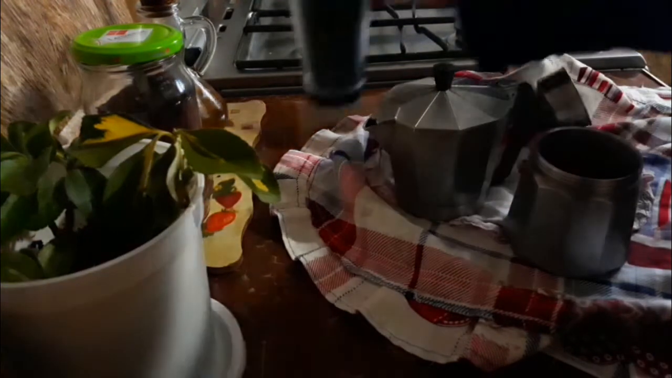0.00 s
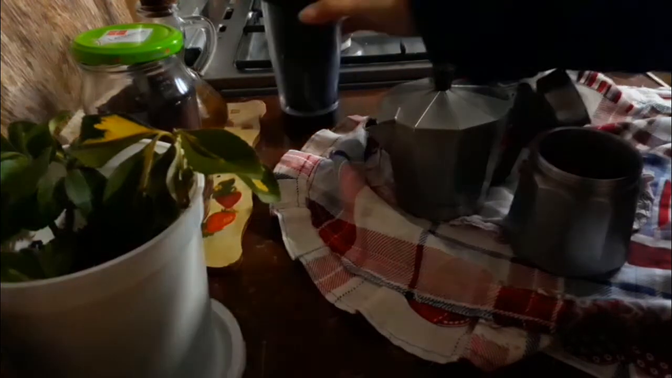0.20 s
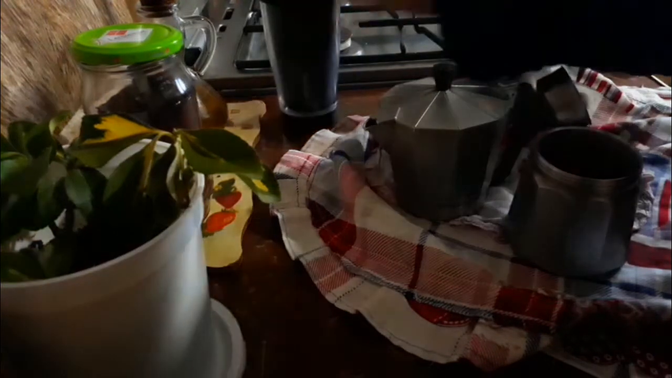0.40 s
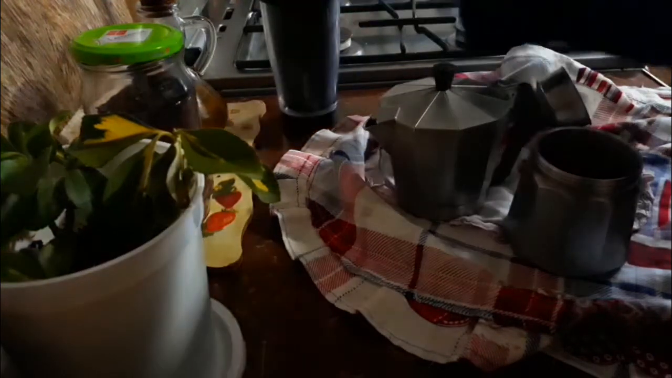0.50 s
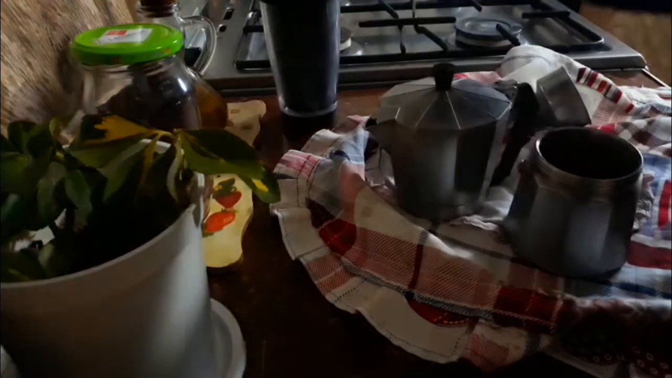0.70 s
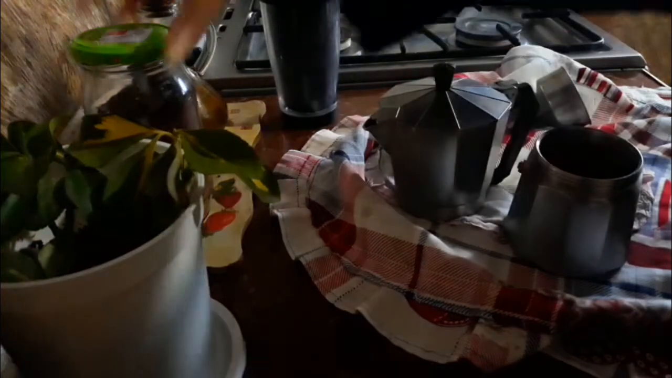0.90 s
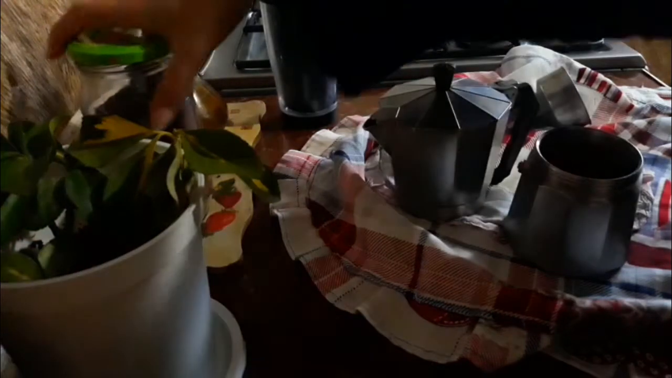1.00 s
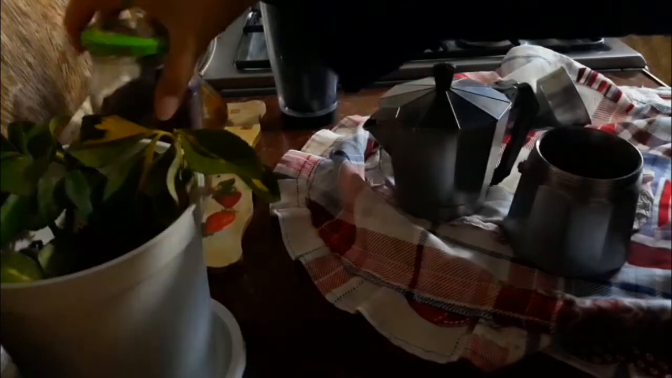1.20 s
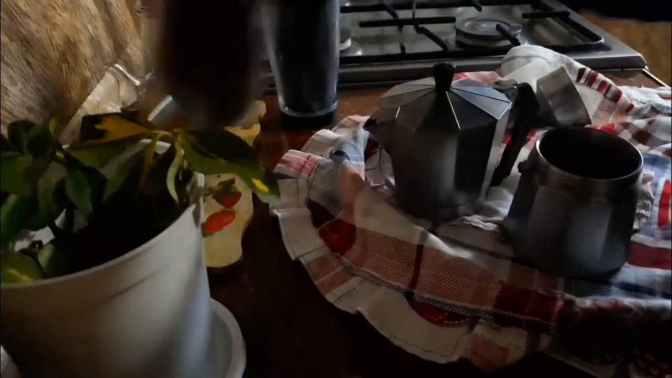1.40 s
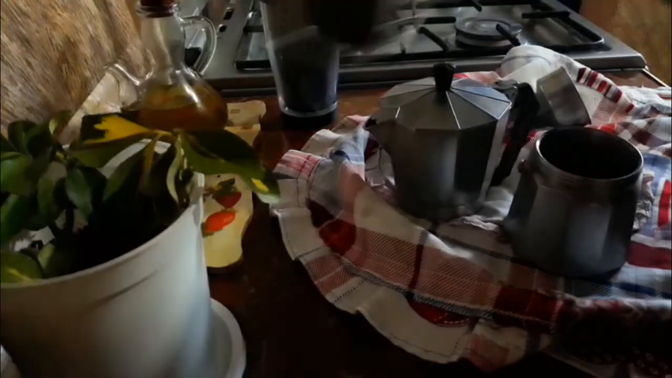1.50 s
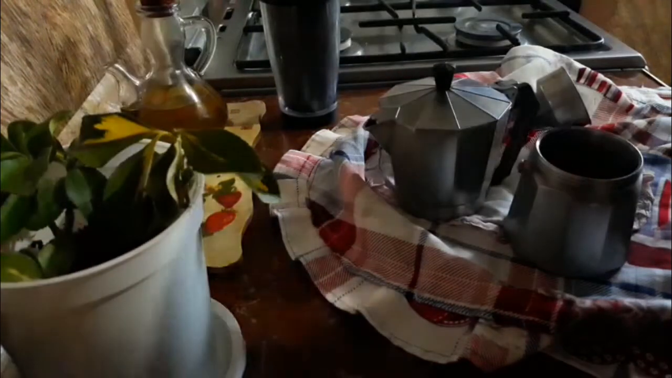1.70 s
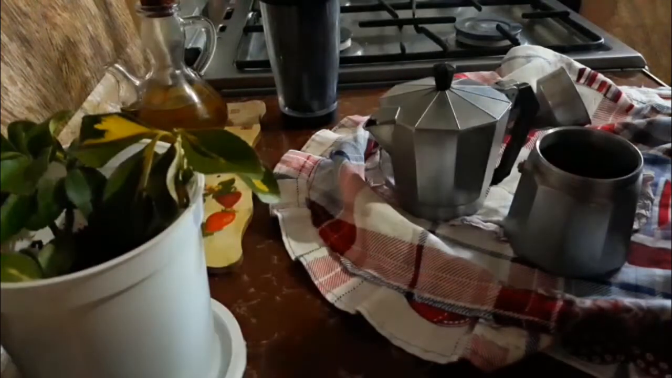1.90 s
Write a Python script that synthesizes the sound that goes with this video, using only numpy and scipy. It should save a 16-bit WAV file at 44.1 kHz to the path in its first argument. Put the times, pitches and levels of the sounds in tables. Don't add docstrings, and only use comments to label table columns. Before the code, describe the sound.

A hollow, woody knock dominates at 0.22 seconds, a light touch and hard blow almost merged, with a weak rebound at 0.3 and a short kitchen echo. Tiny utensil ticks surround it, clearest near 0.39. A faint far squeak comes at 0.76-0.9, a gritty tin lid twist with a small pop and low jar shift around 1.05-1.2, then a close, airy sleeve brush at 1.72-1.95. Low house rumble, hiss and a fading thin whine continue underneath.

```python
import sys
import numpy as np
from scipy import signal
from scipy.fft import rfft, irfft
from scipy.io import wavfile
from scipy.ndimage import uniform_filter1d

SR = 44100
rng = np.random.default_rng(int(sys.argv[2]) if len(sys.argv) > 2 else 0)


def put_to_file(sound):
    columns = np.atleast_2d(sound).T
    safe = np.clip(columns, -1, 1)
    whole_steps = np.round(safe * 32767)
    wavfile.write(sys.argv[1], SR, whole_steps.astype(np.int16))


def rack_gain(trim_db):
    fader = np.asarray(trim_db, float)
    return 10 ** (fader / 20)


N = 88200
T = np.arange(N) / SR

# (time [s], signed force [relative], contact [ms])
BLOWS = [
    (.2233, 0.44, .3),
    (0.2259, 1.2, .36),
    (0.3, 0.18, 1),
]
# (frequency [Hz], level [dB], T60 [s])
PANEL_MODES = [(115, -12, .3), (152, -9, .2), (240.8, 2, 0.22), (276.3, -2, 0.41), (347, -13.5, 0.6),
               (387, 0, .2), (493, -9, .15), (539.3, -9.5, 0.17), (593, 3, .18), (647.4, -20, 0.3),
               (765.4, -5, .25), (860, -22, 0.34), (1010, -12, .1), (1243, -17.5, .12)]
# (frequency [Hz], level [dB])
CRACK_SPECTRUM = [(300, -36), (800, 1), (1200, 7), (2300, -6.5), (3800, -17.5), (5500, -23), (8300, -24),
                  (11000, -39.5)]
# (frequency [Hz], level [dB])
SPILL_SPECTRUM = [(50, -35.5), (130, -10), (260, 2), (650, 1), (1500, -11.5), (2600, -22.5), (5000, -37.5),
                  (8500, -43.5)]
# (time [s], level [dB])
TWIST_EFFORT = [
    (.995, -86),
    (1.015, -77),
    (1.04, -80),
    (1.055, -58.5),
    (1.088, -59),
    (1.101, -48),
    (1.113, -61.5),
    (1.17, -61),
    (1.22, -76),
]
# (frequency [Hz], width [Hz], level [dB], drift as grip shifts [dB/s])
LID_MODES = [(388, 22, 4.5, -34), (730.4, 28.6, 0.5, -34), (1170, 29, -7, -40), (1690, 47, -9.5, -20),
             (1840, 67, -7, 38), (2100, 87, -17, -150), (2550, 78, -9, -65), (2770, 31, -15, -110),
             (3670, 156, -22, 96), (4200, 150, -28, 93), (6220, 53, -18, -10), (9000, 70, -20, -60)]
# (frequency [Hz], level [dB])
GRIT_SPECTRUM = [(100, -21), (250, -6.5), (500, -7), (2000, -23), (4500, -25.5), (8800, -32), (9500, -37)]
# (frequency [Hz], level [dB])
RUB_SPECTRUM = [(1500, -20), (3000, -3), (6000, 2), (8500, -4)]
# (frequency [Hz], level [dB])
RUMBLE_SPECTRUM = [(50, -31), (110, 2), (200, -6.5), (300, -22), (600, -47)]
# (time [s], level [dB])
BRUSH_STROKE = [
    (1.71, -90),
    (1.728, -68),
    (1.76, -68),
    (1.795, -70.5),
    (1.808, -65.5),
    (1.83, -69.5),
    (1.88, -73),
    (1.92, -74),
    (2.0, -79.5),
]
# (frequency [Hz], level [dB])
CLOTH_EARLY = [(2000, -11), (3700, -6), (4700, 4), (8700, 0.5), (9500, -10), (12000, -4), (14000, -11),
               (15200, 1)]
# (frequency [Hz], level [dB])
CLOTH_LATE = [(2000, -8.5), (4000, -5), (6000, 0.5), (8700, 1.5), (9600, -12), (13000, -20), (15500, -16)]
# (start [s], end [s])
CLOTH_TURN_S = (1.82, 1.88)
# (time [s], length [s], frequency [Hz], width [Hz], level [dB])
FOLDS = [
    (1.725, 0.049, 5046, 500, -75),
    (1.785, 0.035, 2740, 300, -76),
    (1.888, 0.054, 2900, 400, -79.5),
]
# (frequency [Hz], width [Hz], level [dB], sag over the hold [dB])
SQUEAK_LINES = [(2590, 70, 0, -7), (2790, 70, 1.5, -22), (2420, 60, -12, -6)]
# (time [s], level [dB], frequency [Hz], width [Hz])
TICKS = [
    (.178, -72, 6500, 3000),
    (.365, -67, 7500, 2000),
    (.391, -59, 8000, 1800),
    (1.806, -66, 8500, 6000),
    (1.014, -74, 2600, 500),
]
# (frequency [Hz], level [dB])
AIR_SPECTRUM = [(38, -25), (62, -2), (115, 1), (170, -6), (240, -17), (600, -24.5), (2000, -32),
                (8800, -35), (9500, -39.5), (15700, -39)]
# (frequency [Hz], T60 [s])
ROOM_DECAY = [(80, 0.6028), (250, .72), (600, .72), (850, 0.67), (1500, 0.67), (2300, 0.59), (3500, 0.48),
              (6000, 0.89), (10000, .5)]


def evened(x):
    return x / np.sqrt(np.mean(x ** 2) + 1e-20)


def coloured(x, spectrum):
    f, db = np.transpose(spectrum)
    hz = np.fft.rfftfreq(len(x), 1 / SR)
    gain = rack_gain(np.interp(np.log(hz + 1), np.log(f + 1), db))
    return irfft(rfft(x) * gain, len(x))


def coloured_noise(spectrum):
    return evened(coloured(rng.standard_normal(N), spectrum))


def curve(points):
    s, db = np.transpose(points)
    return rack_gain(np.interp(T, s, db)) * (T >= s[0])


def resonate(x, hz, width_hz):
    r = np.exp(-np.pi * width_hz / SR)
    pole = r * np.exp(2j * np.pi * hz / SR)
    return 2 * signal.lfilter([1 - r], [1, -pole], x).real


def narrow(x, hz, width_hz):
    return evened(resonate(resonate(x, hz, width_hz), hz, width_hz))


def dying(start_s, t60_s, rise_s):
    t = np.maximum(T - start_s, 0)
    return (1 - np.exp(-t / rise_s)) * rack_gain(-60 * t / t60_s)


def swell(centre_s, length_s):
    return np.exp(-((T - centre_s) / length_s) ** 2)


def highpass(x, hz):
    return signal.sosfilt(signal.butter(2, hz, "highpass", fs=SR, output="sos"), x)


def knock():
    panel_db, thud_db, thud_hz, thud_t60_s = -19, -2.5, 505, 0.014
    crack_db, crack_t60_s, radiate_hz = -16.5, 0.027, 170
    force = sum(size * swell(s, ms / 2000) / (ms * SR / 1000) for s, size, ms in BLOWS)
    t = T[:SR // 2]
    body = sum(rack_gain(panel_db + db - 60 * t / t60_s) * np.sin(2 * np.pi * hz * t)
               for hz, db, t60_s in PANEL_MODES)
    thud = rack_gain(thud_db - 60 * t / thud_t60_s) * np.sin(2 * np.pi * thud_hz * t)
    ring = highpass(signal.fftconvolve(force, body + thud)[:N], radiate_hz)
    crack = coloured_noise(CRACK_SPECTRUM) * dying(BLOWS[0][0] - 0.0003, crack_t60_s, 0.00055)
    return rack_gain(crack_db) * crack - ring


def spill():
    spill_db, rebound_gain = 8, 1.6
    touch, blow, rebound = BLOWS
    clicks = np.zeros(N)
    clicks[round(blow[0] * SR)] = 1
    clicks[round(rebound[0] * SR)] = rebound_gain * rebound[1]
    click = coloured(clicks, SPILL_SPECTRUM) * (T > touch[0])
    return rack_gain(spill_db) * click / np.linalg.norm(click)


def lid():
    slips_per_s, pop_s = 5000, 1.1
    heavy_hz, tin_top_hz, heavy_power = 1400, 5000, 1.35
    body_db, grit_db, rub_db = 19, 23, -76
    slips = (rng.random(N) < slips_per_s / SR) * rack_gain(2.2 * rng.exponential(1, N))
    slips = slips * rng.choice([-1., 1.], N)
    effort = curve(TWIST_EFFORT) * (T < TWIST_EFFORT[-1][0])
    drive = evened(slips) * effort
    push = drive * (effort / effort.max()) ** (heavy_power - 1)
    since_pop_s = np.clip(T - pop_s, -0.1, 0.12)
    body = np.zeros(N)
    for hz, width_hz, db, drift in LID_MODES:
        source = drive if heavy_hz < hz < tin_top_hz else push
        ring = resonate(resonate(source, hz, 2.78 * width_hz), hz, 3.44 * width_hz)
        body += rack_gain(db + body_db + drift * since_pop_s) * ring
    grit = coloured(push, GRIT_SPECTRUM)
    rub = coloured_noise(RUB_SPECTRUM) * swell(1.07, 0.075)
    return body + rack_gain(grit_db) * grit + rack_gain(rub_db) * rub


def sleeve():
    unevenness = evened(uniform_filter1d(rng.standard_normal(N), size=120))
    snaps = rng.standard_normal(N) * rack_gain(1.2 * unevenness)
    late = np.interp(T, CLOTH_TURN_S, [0, 1])
    early_cloth = evened(coloured(snaps, CLOTH_EARLY))
    late_cloth = evened(coloured(snaps, CLOTH_LATE))
    return curve(BRUSH_STROKE) * ((1 - late) * early_cloth + late * late_cloth)


def folds():
    return sum(rack_gain(db) * narrow(rng.standard_normal(N), hz, width_hz) * dying(s, 4 * length_s, 0.0036)
               for s, length_s, hz, width_hz, db in FOLDS)


def rumble():
    level_db = -59
    return rack_gain(level_db) * coloured_noise(RUMBLE_SPECTRUM) * swell(1.1, 0.1)


def squeak():
    start_s, hold_s, rise_s, t60_s, level_db = 0.758, 0.125, 0.01, 0.15, -73.5
    noise = rng.standard_normal(N)
    t = np.maximum(T - start_s, 0)
    tone = sum(rack_gain(db + sag_db * t / hold_s) * narrow(noise, hz, width_hz)
               for hz, width_hz, db, sag_db in SQUEAK_LINES)
    stop_db = -60 * np.maximum(t - hold_s, 0) / t60_s
    return rack_gain(level_db + stop_db) * (1 - np.exp(-t / rise_s)) * tone


def ticks():
    t60_s, rise_s = 0.085, 0.001
    return sum(rack_gain(db) * narrow(rng.standard_normal(N), hz, width_hz) * dying(s, t60_s, rise_s)
               for s, db, hz, width_hz in TICKS)


def air():
    air_db, whine_db, whine_hz, whine_width_hz = -65, -86, 6460, 420
    whine = narrow(rng.standard_normal(N), whine_hz, whine_width_hz)
    fade_db = -6 * T / 0.94
    return rack_gain(air_db) * coloured_noise(AIR_SPECTRUM) + rack_gain(whine_db + fade_db) * whine


def room(x):
    leak_db_per_s2 = -44.5
    taps = np.zeros(SR)
    at = np.arange(120, SR - 12, 12)
    taps[at + rng.integers(0, 12, len(at))] = rng.choice([-1., 1.], len(at))
    hz, t, z = signal.stft(taps, SR, nperseg=512)
    f, t60_s = np.transpose(ROOM_DECAY)
    decay_db = -60 * t / np.interp(hz, f, t60_s)[:, None] + leak_db_per_s2 * t ** 2
    tail = signal.istft(z * rack_gain(decay_db), SR, nperseg=512)[1]
    tail = tail * (np.arange(len(tail)) >= at[0])
    return signal.fftconvolve(x, tail / np.linalg.norm(tail))[:N]


def scene():
    hit_wet_db, small_wet_db, port_hz, port_leak_db = -14, -13, 8730, -16
    hit = knock()
    small = lid() + ticks()
    wet = room(spill() + rack_gain(hit_wet_db) * hit + rack_gain(small_wet_db) * small)
    near = hit + small + wet
    port = signal.sosfilt(signal.ellip(6, 1, 40, port_hz, fs=SR, output="sos"), near)
    direct = squeak() + sleeve() + folds() + air() + rumble()
    return (port + rack_gain(port_leak_db) * near + direct)[None]


def top_cut(x):
    return signal.sosfilt(signal.butter(12, 15910, fs=SR, output="sos"), x)


def record(dry):
    return top_cut(highpass(dry, 60))


dry = scene()
out = record(dry)
put_to_file(out)
```